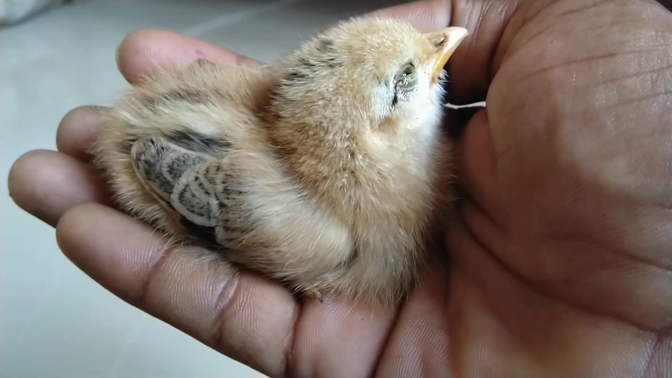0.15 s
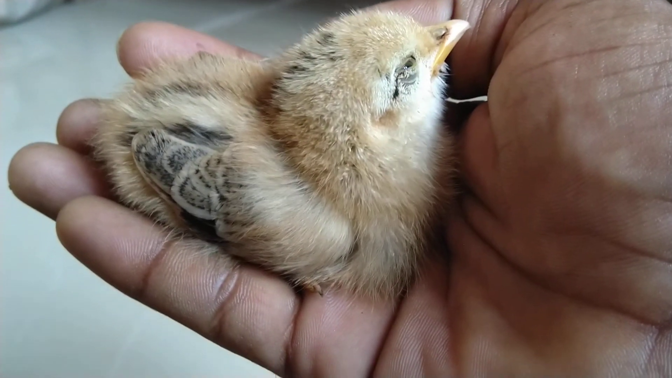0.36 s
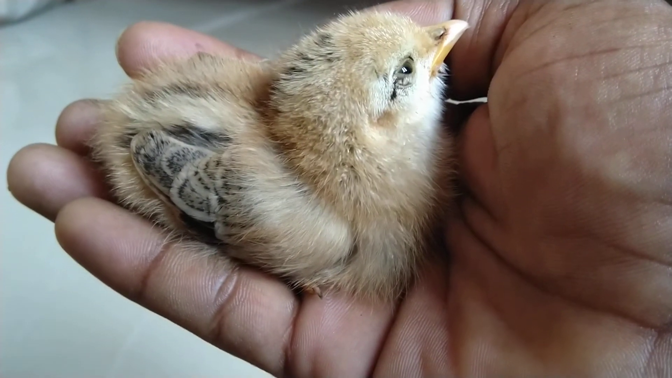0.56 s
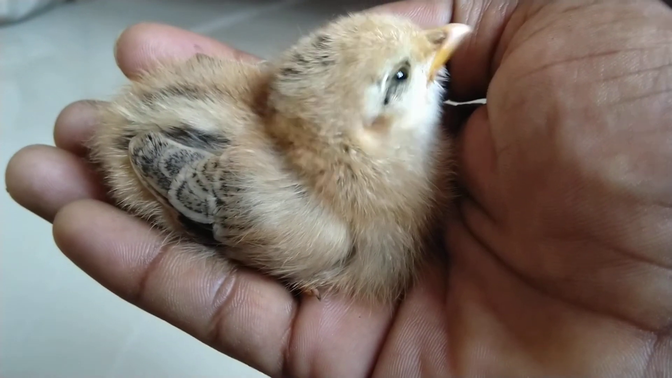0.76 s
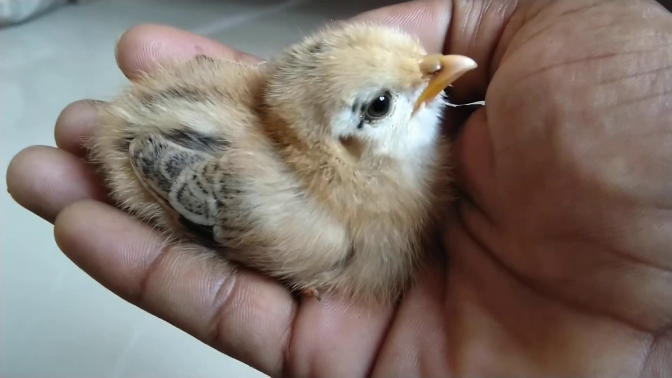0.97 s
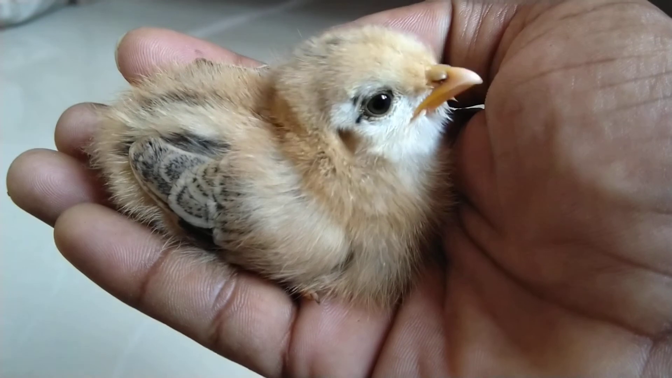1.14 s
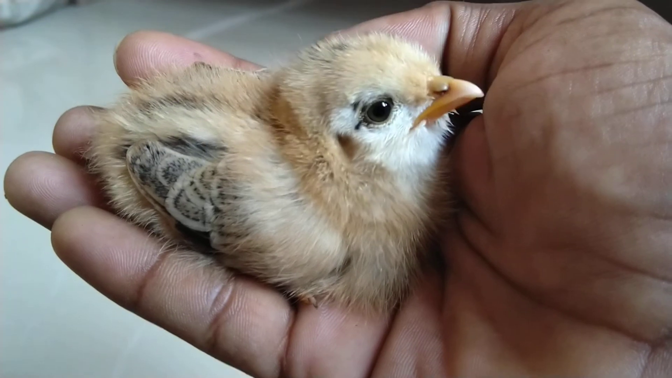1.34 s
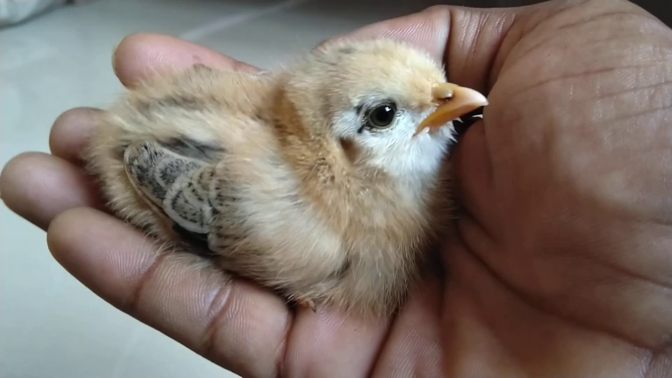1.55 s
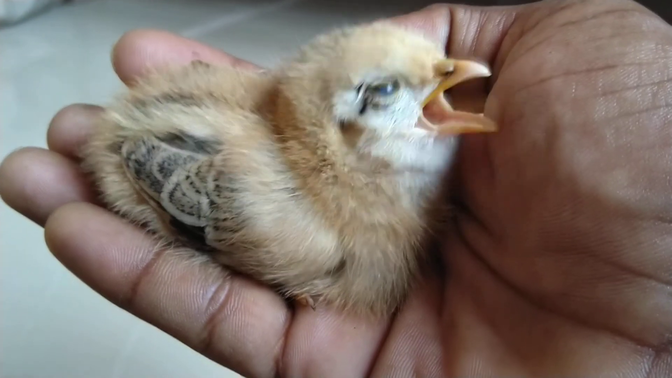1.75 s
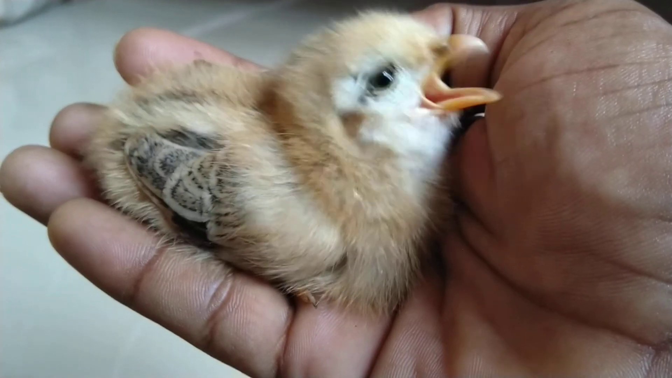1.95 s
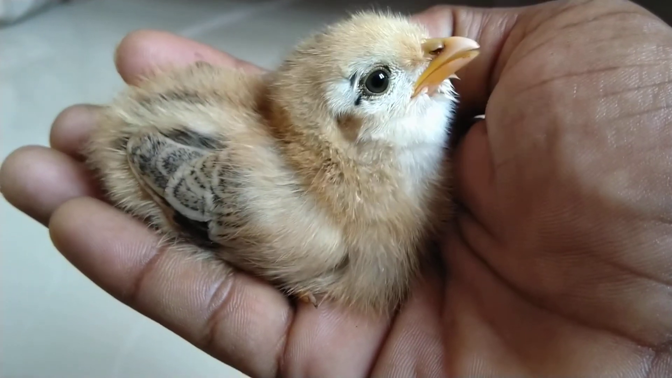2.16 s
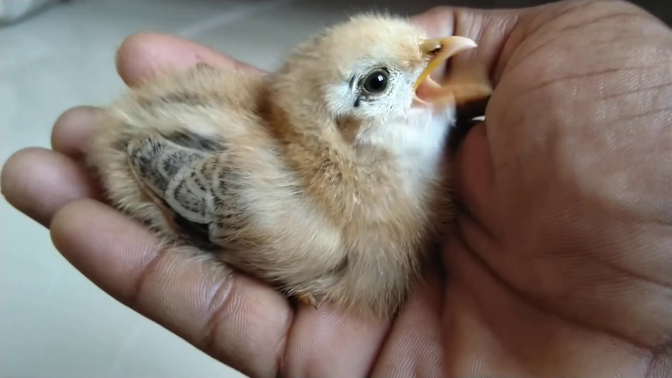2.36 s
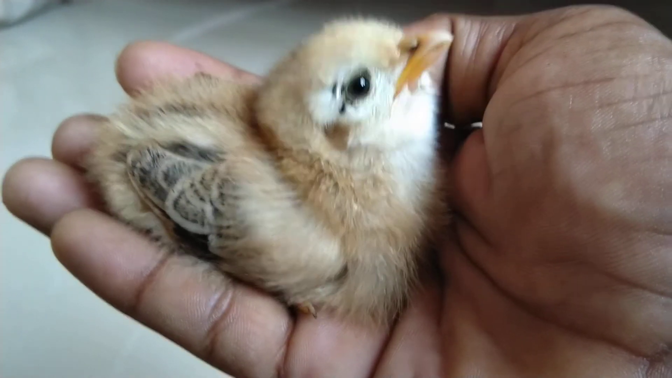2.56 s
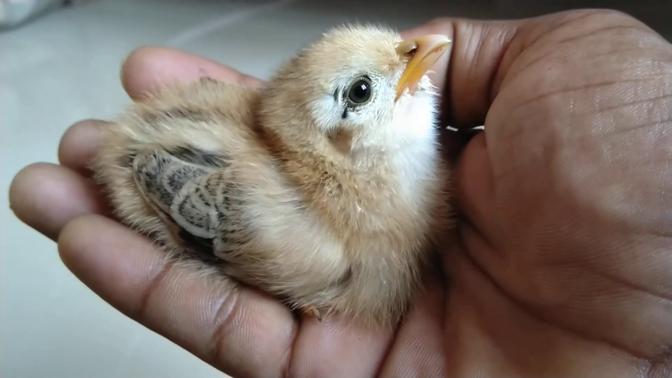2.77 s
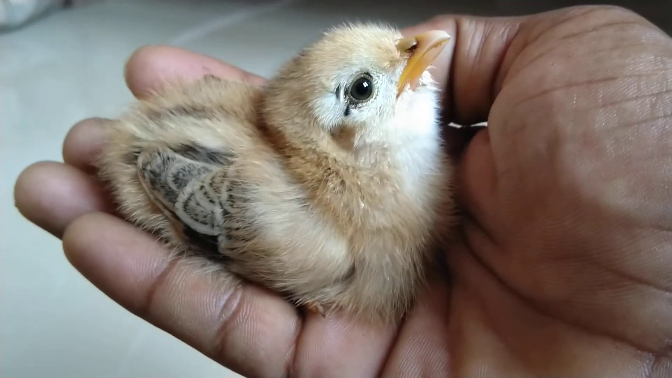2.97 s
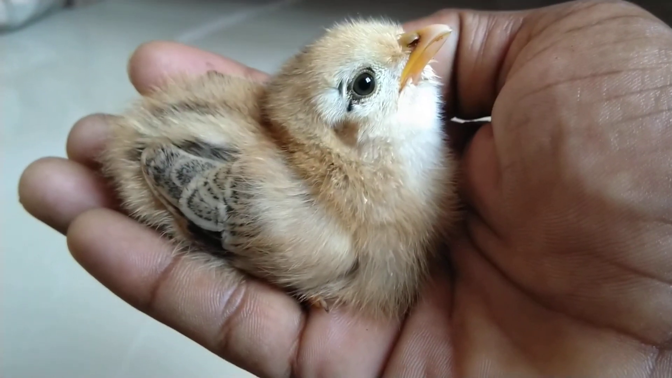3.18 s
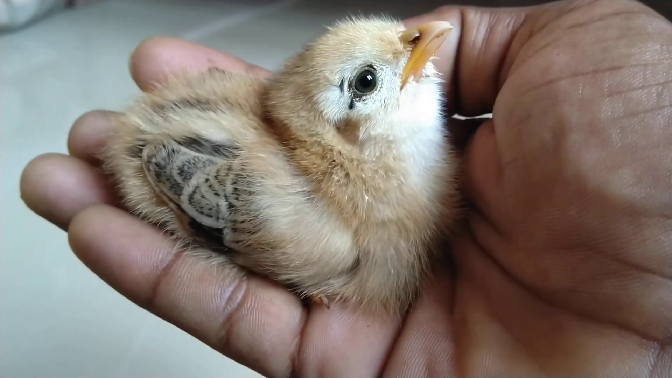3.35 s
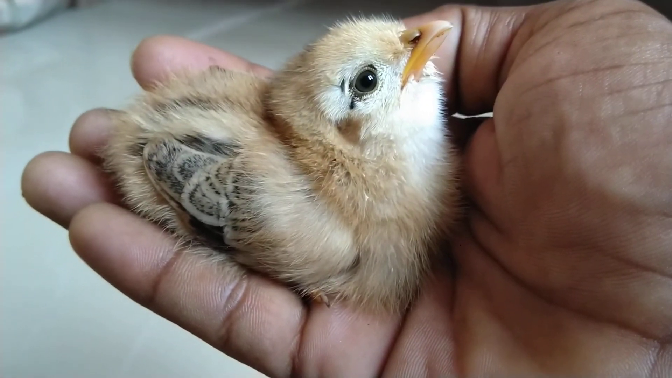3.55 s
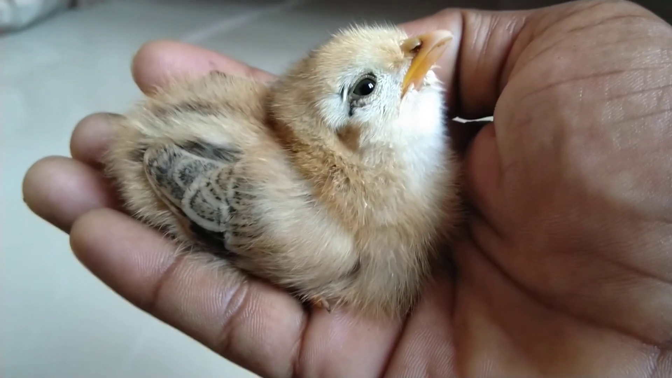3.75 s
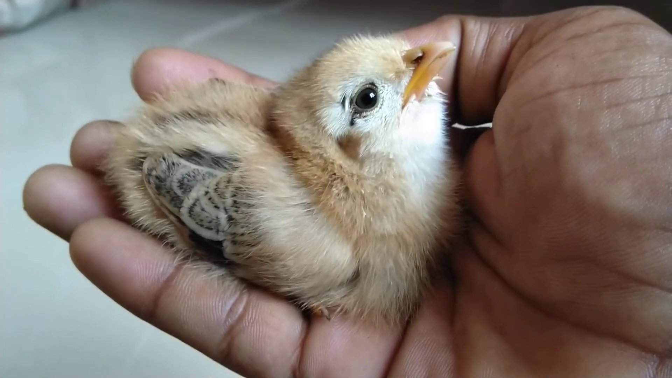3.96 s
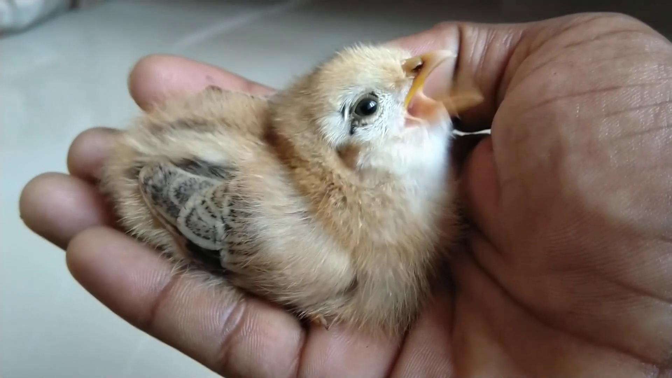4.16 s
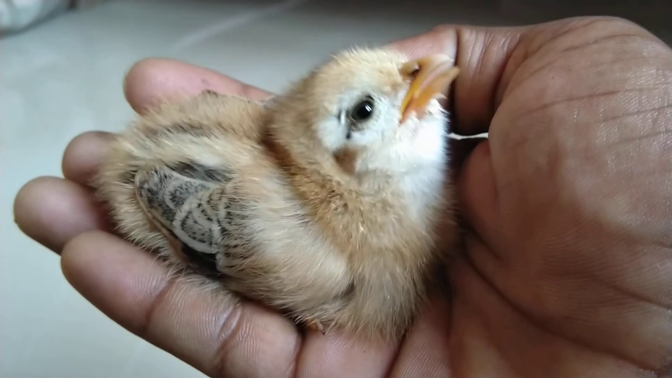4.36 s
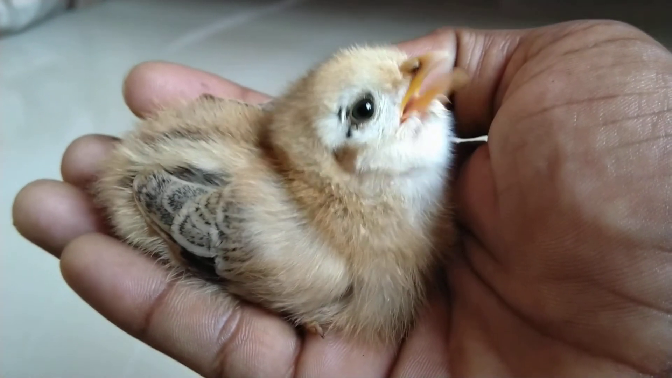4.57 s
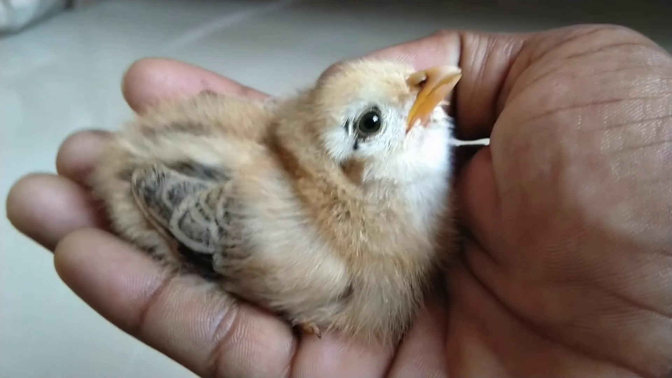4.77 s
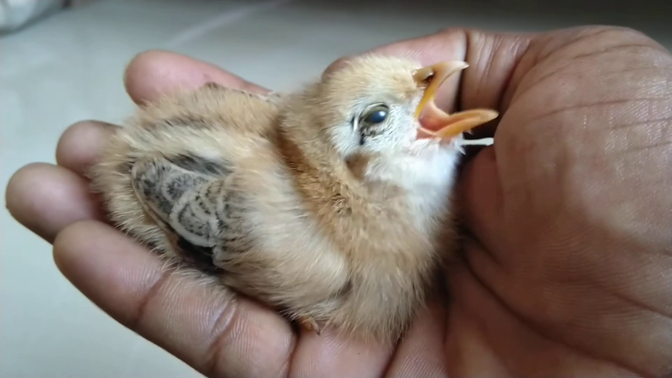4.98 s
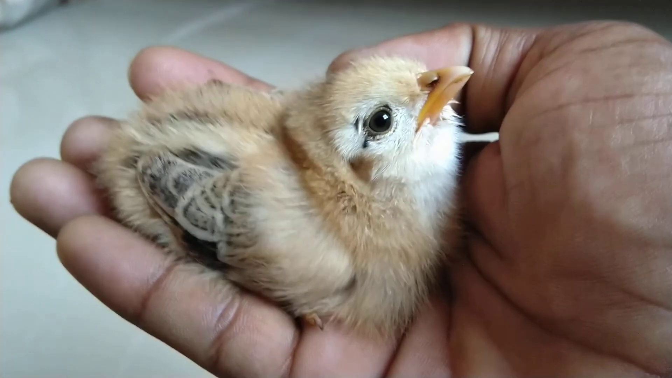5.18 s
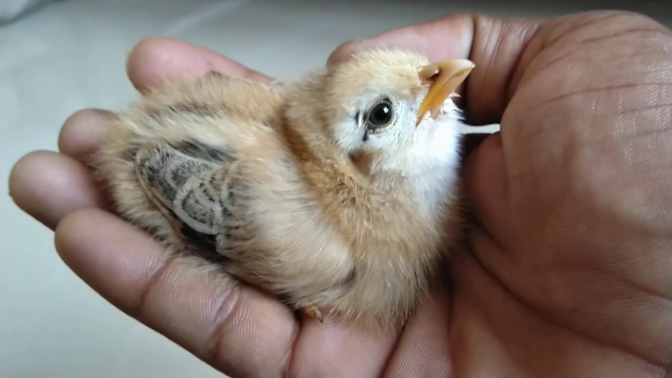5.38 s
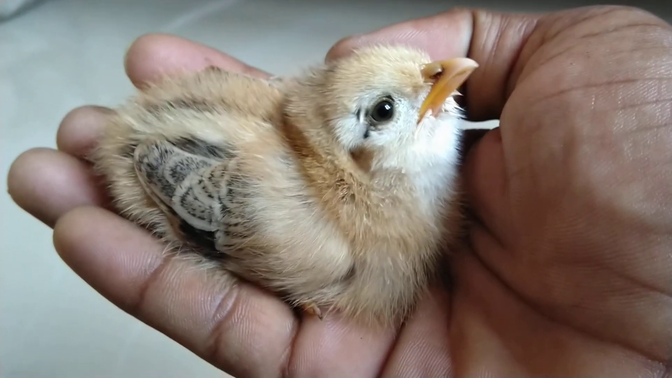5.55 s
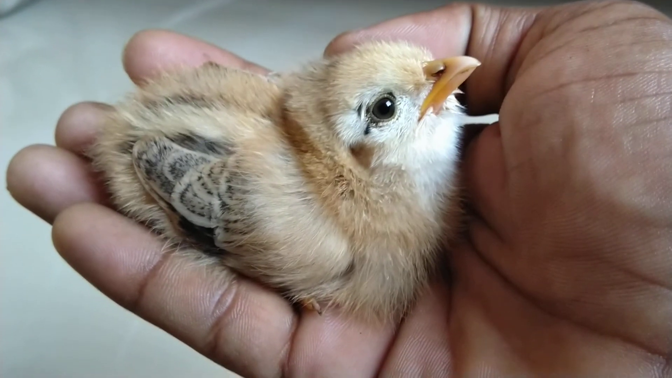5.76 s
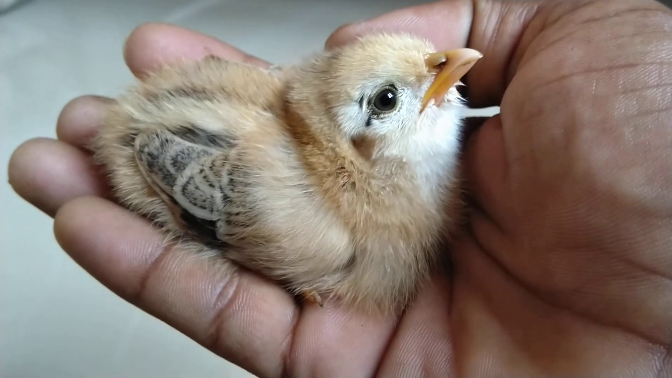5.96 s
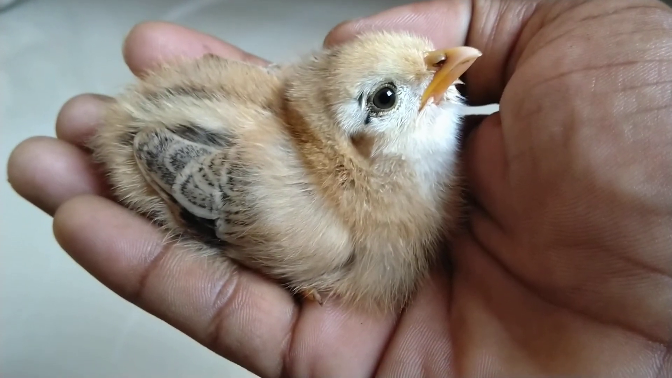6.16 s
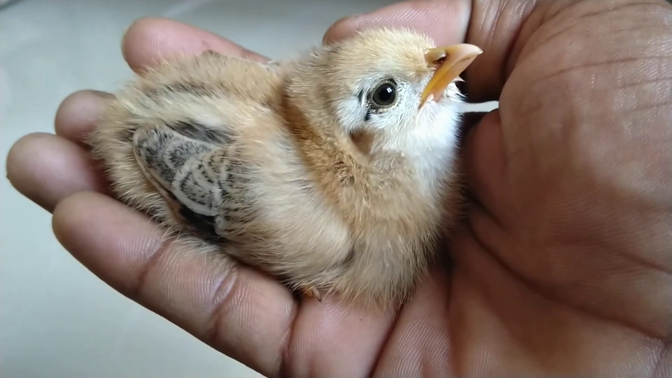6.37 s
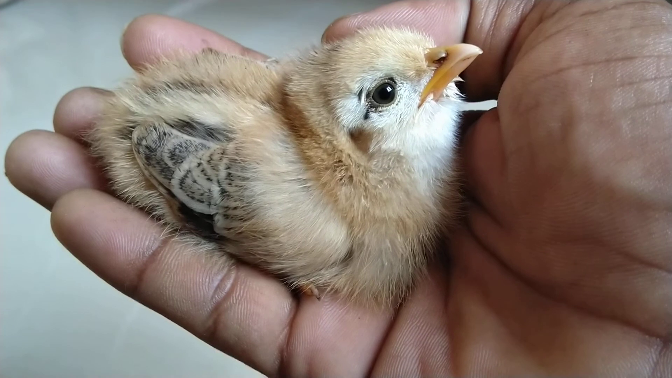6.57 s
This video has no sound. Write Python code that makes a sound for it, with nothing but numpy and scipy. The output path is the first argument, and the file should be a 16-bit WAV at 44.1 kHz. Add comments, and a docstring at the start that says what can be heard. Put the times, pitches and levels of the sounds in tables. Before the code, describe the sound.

Six sharp high chirps from a small chick, in two groups of three, ring off hard walls; soft rustles and tiny knocks lie between.

```python
"""Chick peeping in the hand

A chick held in a hand peeps six times, in two bursts of three, close to a phone in a bare, echoing room.
Each peep is a sine whistle with overtones: it arches to about 5 kHz, breaks to a lower, richer register
and slides down. Shaped noise makes the echo, the quiet hum of the room, rustling down, a shifting hand and
far-off swells; fading sines make soft knocks. The phone turns loud peeps down, so the echo swells after."""
import sys
import numpy as np
from scipy import signal
from scipy.fft import rfft, irfft, next_fast_len
from scipy.io import wavfile
from scipy.ndimage import uniform_filter1d, minimum_filter1d, map_coordinates

SR = 44100
rng = np.random.default_rng(int(sys.argv[2]) if len(sys.argv) > 2 else 0)


def log_audio(samples):
    """Write samples as a 16-bit WAV file to the path given in sys.argv[1]."""
    # one column per channel
    frames = np.atleast_2d(samples).T
    # limit to full scale, then quantise
    limited = np.clip(frames, -1, 1)
    pcm = np.round(limited * 32767).astype(np.int16)
    wavfile.write(sys.argv[1], SR, pcm)


N = 291942  # length in samples


def amp(db):
    """Turn decibels into a gain."""
    return 10 ** (np.asarray(db) / 20)


def unit(x):
    """Scale to an average strength (rms) of 1."""
    return x / np.sqrt(np.mean(x ** 2) + 1e-20)


def along(points, hz, axis=1):
    """Read one column of a table whose first column is f/Hz, in between its rows on a log axis."""
    cols = np.transpose(points)
    return np.interp(np.log(hz + 1), np.log(cols[0] + 1), cols[axis])


def wobble(rate):
    """A smooth random curve through `rate` random points a second."""
    points = rng.standard_normal(int(N * rate / SR) + 4)
    return map_coordinates(points, [np.arange(N) * rate / SR], order=2)


def filtered(x, response):
    """Filter x by a response (gain, and phase if complex) that depends on frequency."""
    m = next_fast_len(N + SR // 2)  # spare room, so that the end does not wrap round to the start
    return irfft(rfft(x, m) * response(np.fft.rfftfreq(m, 1 / SR)), m)[..., :N]


def noise(response, channels=2):
    """Coloured noise of rms 1, unrelated between channels."""
    return unit(filtered(rng.standard_normal((channels, N)), response))


def bell(t, centre, half):
    """A smooth rise and fall around a moment."""
    return np.exp(-((t - centre) / half) ** 2 / 2)


def swells(rows):
    """Gain over time from rows of swells: t/s, half length/s, level/dB."""
    return sum(amp(db) * bell(np.arange(N) / SR, s, half) for s, half, db in rows)


def room_tone(tone_db=-60.0):
    """Steady hush of coloured noise, near mono in the bass; its level drifts slightly."""
    # colour of the quiet room: f/Hz, density/dB
    quiet = [(20, -18), (50, 0.5), (85, -5.5), (140, -4), (240, -8.5), (374, -13.5), (550, -16.5),
             (900, -12), (1300, -17), (2000, -23.5), (3800, -19), (9000, -31), (14000, -34.5),
             (16000, -29.5)]
    # how alike left and right are: f/Hz, likeness (1 = the same, 0 = unrelated)
    alike = [(60, 1), (180, 1), (550, 0.53), (1650, 0.0), (4970, 0.27), (15000, 0)]

    def turn(hz):
        # the angle that shares the sound between middle and sides
        return np.arccos(np.clip(along(alike, hz), -1, 1)) / 2

    mid, side = noise(lambda hz: amp(along(quiet, hz)) * [np.cos(turn(hz)), np.sin(turn(hz))])
    return unit(np.array([mid + side, mid - side])) * amp(tone_db + 0.6 * wobble(1.7))


def handling(rumble_hz=55, scratch_db=1.5):
    """Down rustles as uneven, coloured noise; the hand that holds the phone rumbles as low noise."""
    # down against the palm: t/s, half length/s, level before the scratching/dB
    rustle_times = [(.17, 0.035, -67.5), (1.11, 0.12, -59.5), (1.44, .06, -61)]
    # the hand shifts on the phone: t/s, half length/s, level/dB
    grip_times = [(1.63, .08, -61.5), (4.55, .15, -60.5)]
    # colour of rustling down: f/Hz, density/dB
    down_colour = [(1200, -23.5), (2800, 0), (4200, -0.5), (7000, -7.5), (11000, -19), (14000, -14.5)]
    scratch = amp(scratch_db * wobble(70))
    rustle = swells(rustle_times) * scratch * noise(lambda hz: amp(along(down_colour, hz)))
    rumble = swells(grip_times) * noise(lambda hz: hz / (1 + (hz / rumble_hz) ** 4), channels=1)
    return rustle + rumble


def far_sounds(width=0.19):
    """Soft swells from outside: noise in a band around one pitch, `width` as a share of that pitch."""
    # faint, far-off sounds: t/s, half length/s, f/Hz, level/dB
    far_swells = [(.4, 0.044, 876, -61.5), (.55, 0.058, 765, -63), (.98, 0.14, 812, -57.5),
                  (1.33, 0.11, 1360, -68.5), (2.95, 0.058, 847, -64.5), (3.8, 0.04, 880, -61.5),
                  (5.17, .07, 974, -60), (5.55, .15, 1250, -66), (6.2, 0.26, 841, -67.5),
                  (6.155, 0.28, 1660, -72), (6.41, .045, 3800, -64.5)]
    out, t = np.zeros((2, N)), np.arange(N) / SR
    for s, half, centre, db in far_swells:
        band = noise(lambda hz: 1 / (1 + (2 * (hz / centre - 1) / width) ** 2), channels=3)
        left_right = unit(band[:2] + band[2])  # the third noise is common to both sides
        out += left_right * amp(db) * bell(t, s, half)
    return out


def glide(u, length, top_s, break_s, top_hz, edge_hz, low_hz, bow, steady, tremor_hz):
    """Pitch u seconds into a peep: it arches up, sags, breaks to the low register and slides away."""
    rise_hz_per_s, arch = 36000, 1.5  # mean speed of the opening rise, and how it rounds off at the top
    tremor_per_s = 37  # how fast an unsteady peep quavers
    change_s = .0023  # sets how quickly the voice drops into the low register
    end_hz, collapse = 2450, 7.5  # last pitch of the slide; lateness of its final plunge, before the bow
    rise = rise_hz_per_s * top_s * np.maximum(1 - u / top_s, 0) ** arch
    sag = (top_hz - edge_hz) * np.maximum((u - top_s) / (break_s - top_s), 0) ** bow
    tremor = tremor_hz * np.sin(2 * np.pi * tremor_per_s * (u - top_s) + np.pi / 4)
    gone = np.clip((u - break_s) / (length - break_s), 0, 1)  # share of the slide that has passed
    slide = (low_hz - end_hz) * (steady * gone + (1 - steady) * gone ** (collapse * bow))
    broken = (1 + np.tanh((u - break_s) / change_s / 2)) / 2
    return (1 - broken) * (top_hz - rise - sag + tremor) + broken * (low_hz - slide)


def effort(u, length, break_s, pitch):
    """Gain of the voice: a soft start, full swing, a falter at the break, then a fade as the pitch sinks."""
    attack_s, release_s = .002, .005  # length of the ramps in and out
    soft_start_db, swell_s = 9, .0055
    falter_db, falter_s = 4, .003  # the voice weakens while it changes register
    fade_hz, fade_db_per_hz = 2900, .033  # below this pitch the membranes lose their swing
    gate = np.clip(np.minimum(u / attack_s + .5, (length - u) / release_s + .5), 0, 1)
    start_loss_db = soft_start_db * bell(np.maximum(u, 0), 0, swell_s)
    break_loss_db = falter_db * bell(u, break_s, falter_s)
    fade_db = fade_db_per_hz * np.maximum(fade_hz - pitch, 0)
    return np.sin(np.pi / 2 * gate) ** 2 * amp(-start_loss_db - break_loss_db - fade_db)


def overtones(pitch, phase, sharpness, knee_hz=6500, knee_db=-29, octave_db=24, slack_hz=3000, slack_db=9):
    """Harmonics 2 to 5 weaken with frequency and rise where they cross a resonance of throat and beak."""
    # overtones as the throat and open beak pass them: f/Hz, relative level/dB
    throat = [(4900, -38.5), (5600, -29), (6400, -28.5), (7000, -19.5), (7900, -29.5), (8600, -57),
              (9500, -48.5), (10400, -36), (11200, -50.5), (12200, -61), (13000, -54.5), (13800, -37.5),
              (15500, -58)]

    def colour(hz):
        # between a plain fall per octave and the full resonances
        plain = knee_db - octave_db * np.log2(np.maximum(hz / knee_hz, 1))
        return sharpness * along(throat, hz) + (1 - sharpness) * plain

    # as the membranes go slack at the bottom of the slide, the higher overtones fade most
    slack = slack_db / (1 + np.exp((pitch - slack_hz) / 150))
    total = 0
    for k in range(2, 6):
        gain = amp(colour(k * pitch) - slack * np.log2(k / 2))
        audible = k * pitch < SR / 2  # leave out what the sample rate cannot hold
        total = total + gain * audible * np.sin(k * phase)
    return total


def ports(x, bearing):
    """A close source reaches two microphone ports unequally; the phase follows the head's bearing."""
    # the two ports: f/Hz, left minus right/dB, left phase lead before the bearing/rad
    port_table = [(2400, 3, 1.9), (2900, 1, 2.4), (3150, 3, 2.7), (3350, 4.5, 2.4), (4000, 4, 2.7),
                  (4450, 5, 2.7), (4770, 10, 1.8), (5100, 8, -.6), (5600, 4, 0), (7000, 2, 2),
                  (14000, -1, 1.4)]

    def pair(hz):
        # half the difference goes to each side, at an unchanged total power
        g = amp(along(port_table, hz) / 2) * np.exp(.5j * bearing * along(port_table, hz, axis=2))
        return np.array([g, 1 / g]) / np.sqrt((abs(g) ** 2 + abs(g) ** -2) / 2)

    return filtered(x, pair)


def peep(row, waver, flutter, rasp):
    """One whistle, rougher below the register break: what reaches the ports, and what spreads in the room."""
    # strength toward the phone as the pitch crosses resonances of beak and hand: f/Hz, ripple/dB
    beam_ripple = [(2900, 1.15), (3180, 2.4), (3360, 8), (3430, 3.5), (3490, -6.5), (3620, -3), (4350, -4),
                   (4680, 1), (4880, -4), (5100, 1)]
    # the whistle toward the phone dips briefly: t/s, depth/dB
    dip_times = [(1.756, 5), (1.992, 4.5), (2.026, 5.5), (2.42, 2.5), (2.46, 5.5), (4.226, 16.5),
                 (4.52, 7.5), (4.984, 5.5)]
    # the rising voice flicks upward: t/s, size of the flick/Hz
    flick_times = [(1.9772, 250), (2.403, 250), (2.4202, 401.3), (4.205, 301.5), (4.475, 260.4),
                   (4.4857, 400)]
    break_hz, dip_s, flick_s = 4100, .0035, .0006
    brighten_s, opening_s = .008, .025  # time for the overtones to come in, and for the beak to open
    rasp_db, spread_db, purer_db = -56.5, -11, 2  # relative levels; the high register is purer
    (start, length, top_s, break_s, *shape, high_db, low_db, ripple, bearing,
     overtone_db, sharpness, high_room_db, low_room_db) = row
    on = np.arange(int((start - .002) * SR), int((start + length + .005) * SR))  # with its ramps
    t = on / SR
    u = t - start
    pitch = glide(u, length, top_s, break_s, *shape)
    low = 1 / (1 + np.exp((pitch - break_hz) / 200))  # 0 in the high register, 1 in the low
    gain = effort(u, length, break_s, pitch) * amp((2.7 + 0.9 * low) * flutter[on])
    dips_db = sum(db * bell(t, s, dip_s) for s, db in dip_times)
    beam_db = high_db + low * (low_db - high_db) + ripple * along(beam_ripple, pitch) - dips_db
    flicks = sum(hz * np.exp(-((t - s) / flick_s) ** 2) for s, hz in flick_times)
    pitch = pitch * (1 + (0.002915 + 0.0053 * low) * waver[on]) + flicks
    phase = 2 * np.pi * np.cumsum(pitch) / SR
    whistle = np.sin(phase)
    # the overtones come in after the whistle itself, and the room fills only as the beak opens wide
    brightness = (1 - bell(u, 0, brighten_s)) * amp(overtone_db - purer_db * (1 - low))
    upper = brightness * overtones(pitch, phase, sharpness) + low * amp(rasp_db) * rasp[on]
    beak = 1 - np.exp(-(u / opening_s) ** 2)
    beamed = amp(beam_db) * whistle + upper
    room_gain = amp(high_room_db + low * (low_room_db - high_room_db))
    spread = beak * (amp(spread_db) * whistle + upper) * room_gain
    out = np.zeros((2, N))
    out[:, on] = gain * np.array([beamed, spread])
    return ports(out[0], bearing), out[1]


def room(x, first_wall_s=.022, build_s=0.0067):
    """Hard walls: a late, diffuse tail of fading noise, unrelated at the two ports."""
    # time to fade by 60 dB: f/Hz, t60/s
    decay = [(2500, 0.67), (5000, 0.84), (7000, 0.54), (10000, 0.47), (14000, 0.3)]
    hz, t, z = signal.stft(rng.standard_normal((2, SR)), SR, nperseg=256)
    build = 1 - np.exp(-np.maximum(t - first_wall_s, 0) / build_s)  # silent until the nearest wall answers
    fade = amp(-60 * t / along(decay, hz)[:, None]) * build
    fade /= np.sqrt(np.mean(fade ** 2, axis=1, keepdims=True) * SR)  # equal energy in every band
    tail = signal.istft(z * fade, SR, nperseg=256)[1]
    return signal.fftconvolve(x[None], tail, axes=1)[:, :N]


def chick(level_db=11.5, wet_db=-14.5, sputter_db=4):
    """Six peeps, each heard directly and off the walls."""
    # one row a peep, levels relative:
    # timing: start/s, length/s, time to the top/s, time to the register break/s,
    # pitch: top/Hz, before the break/Hz, after it/Hz, bow of the sag (over 1 = holds the pitch longer),
    #   share of the closing slide at an even speed, tremor/Hz,
    # toward the phone: high register/dB, low register/dB, share of the beam's ripple,
    #   share of the ports' phase lead,
    # voicing: overtones/dB, sharpness of the beak's resonances (0-1),
    #   high register into the room/dB, low register into the room/dB
    peep_rows = [ (1.718, .127, .009, .0935, 4790, 3690, 3530, .6, .95, 75, -10.5, -10, .4, .97, -.5, .4, -7, -2.5),
                 (1.970, .126, .023, .065, 5110, 4420, 3790, .65, .62, 0, -8.5, -12.3, 1.25, .82, 0, .5, -1.5, .7),
                 (2.394, .147, .029, .0917, 5180, 4320, 3490, 1.3, .38, 0, -11, -14, 1.2, .69, -5, .94, .5, .5),
                 (4.196, .139, .026, .0698, 5040, 4240, 3560, 1.56, .53, 0, -10, -12.6, 1.1, .99, 1, .83, -1.5, -1.5),
                 (4.468, .140, .022, .072, 5150, 4680, 3700, .9, .53, 0, -10.4, -13.2, 1.2, 1, -2, .8, .5, -1),
                 (4.968, .144, .031, .0887, 5260, 4630, 3700, 1.42, .56, 0, -13, -12.3, 1, 1, -.5, .85, .8, -3.8)]
    # roughness of the low register: f/Hz, density/dB
    rasp_colour = [(400, -19.5), (1200, -1), (2000, -1.5), (3500, 3), (7000, -26), (15000, -7)]
    # colour of the echo: f/Hz, relative level/dB
    echo_colour = [(2400, -14), (2800, -11), (3150, -4), (3400, 1.5), (3700, 1.5), (4250, 7.2), (4750, 7),
                   (5200, 6), (5700, 5), (7000, 4.5), (10000, 5.5), (13600, 8), (15500, 0)]
    waver, flutter = wobble(500), wobble(300)  # unsteadiness of pitch and of strength
    hiss = noise(lambda hz: amp(along(rasp_colour, hz)), channels=1)[0]
    rasp = unit(hiss * amp(sputter_db * wobble(120)))
    direct, spread = zip(*[peep(row, waver, flutter, rasp) for row in peep_rows])
    echo = filtered(sum(room(p) for p in spread), lambda hz: amp(wet_db + along(echo_colour, hz)))
    return amp(level_db) * (sum(direct) + echo)


def knocks(t60=0.054):
    """Dull, short knocks of the hand on the phone: sines that fade by 60 dB in t60 seconds."""
    # soft handling knocks: t/s, level/dB, f/Hz
    knock_times = [(3.279, -50, 390), (3.75, -52.5, 310), (6.022, -51.5, 372), (6.165, -49.5, 390)]
    out = np.zeros(N)
    for s, db, hz in knock_times:
        t = np.maximum(np.arange(N) / SR - s, 0)
        out += amp(db - 60 * t / t60) * np.sin(2 * np.pi * hz * t)
    return out


def scene():
    """The chick in its room."""
    return room_tone() + handling() + far_sounds() + chick() + knocks()


def gain_control(x, threshold_db=-18, depth_db=9, release_db=80):
    """Loud sound quickly pulls the gain down, by depth_db at most; it returns at release_db a second."""
    level = 10 * np.log10(abs(uniform_filter1d(np.mean(x ** 2, axis=0), size=256)) + 1e-12)
    ramp = release_db * np.arange(N) / SR
    # a running maximum against a ramp holds each cut and lets it go at a steady speed
    cut = np.maximum.accumulate(np.clip(level - threshold_db, 0, depth_db) + ramp) - ramp
    return x * amp(-uniform_filter1d(uniform_filter1d(cut, size=128), size=128))


def limiter(x):
    """Peaks above full scale are turned down smoothly."""
    needed = 1 / np.maximum(abs(x).max(axis=0), 1)
    held = minimum_filter1d(needed, size=257)
    return x * uniform_filter1d(uniform_filter1d(held, size=127), size=127)


def record(dry, split_hz=1100, top_hz=15850):
    """The phone rides the gain above the bass, limits its peaks and keeps nothing from top_hz up."""
    bass = filtered(dry, lambda hz: 1 / (1 + (hz / split_hz) ** 4))
    levelled = bass + gain_control(dry - bass)
    return filtered(limiter(levelled), lambda hz: hz < top_hz)


dry = scene()
out = record(dry)
log_audio(out)
```